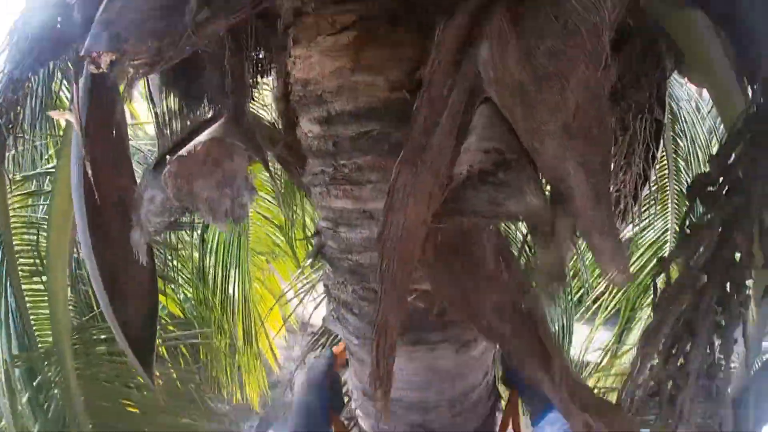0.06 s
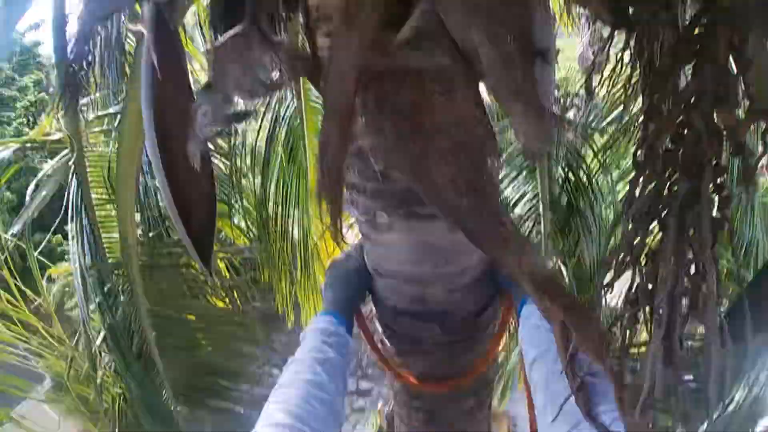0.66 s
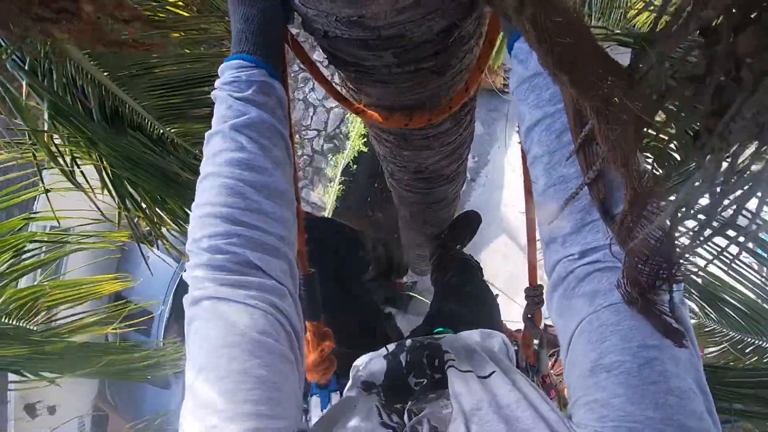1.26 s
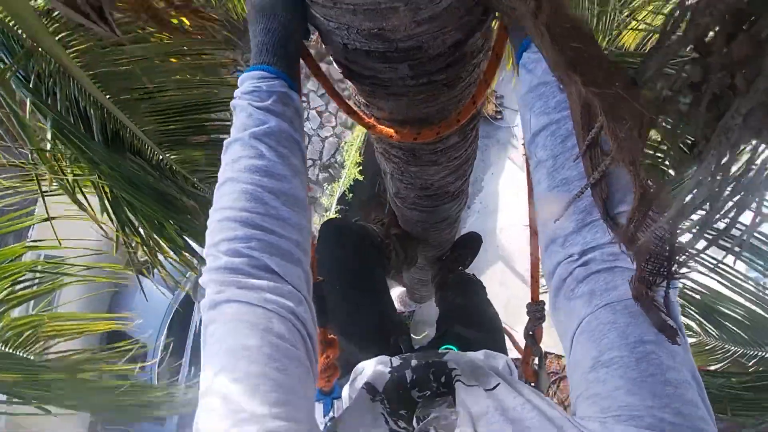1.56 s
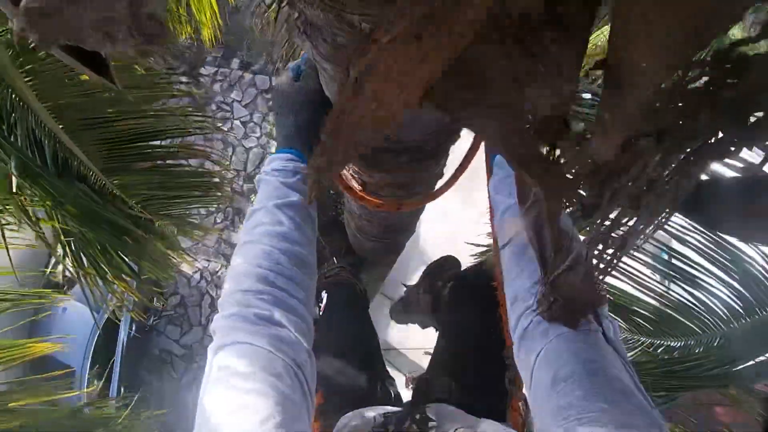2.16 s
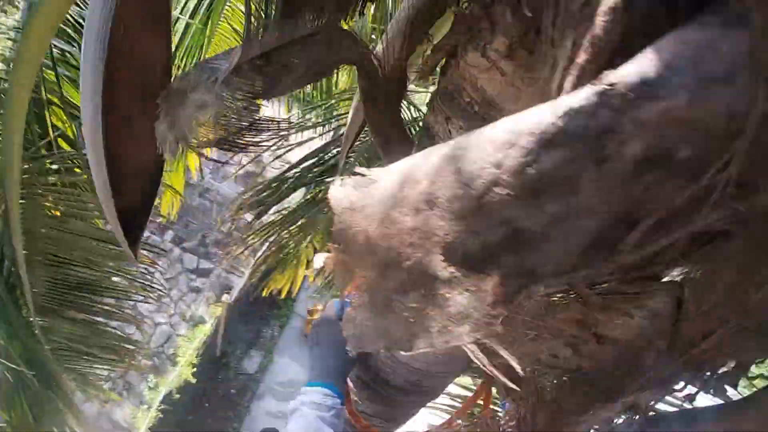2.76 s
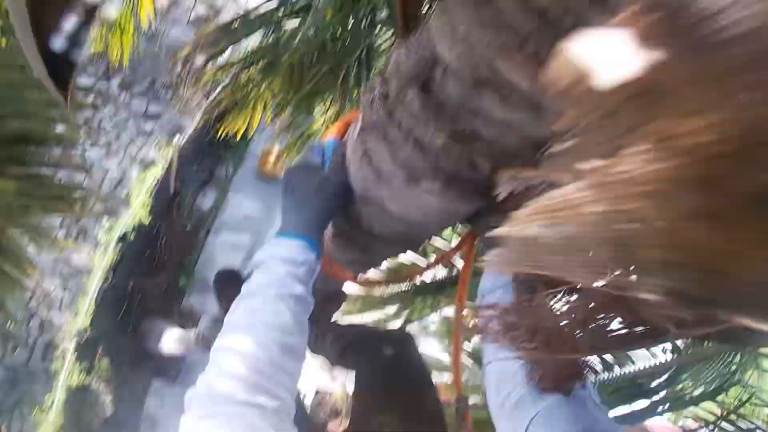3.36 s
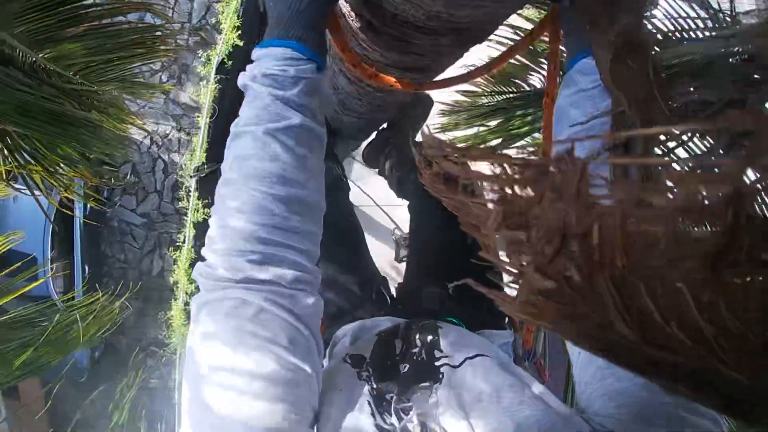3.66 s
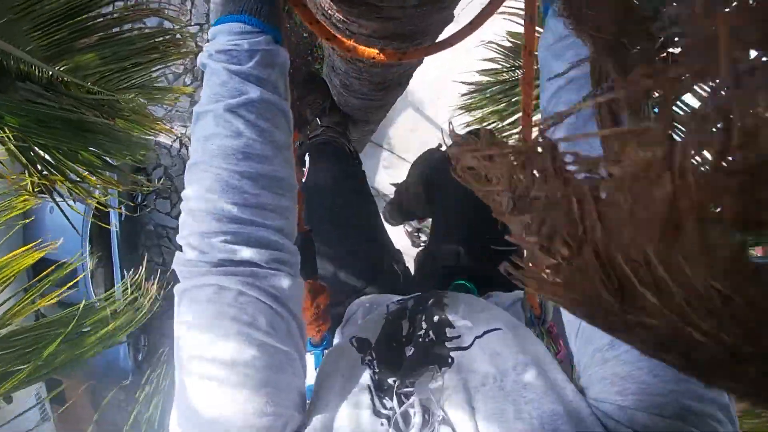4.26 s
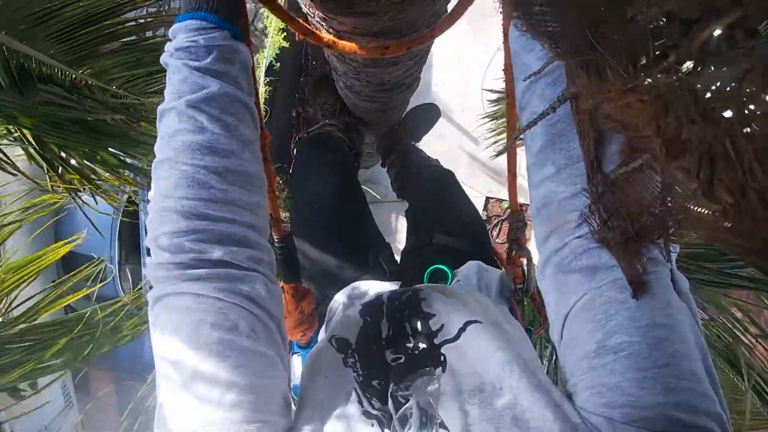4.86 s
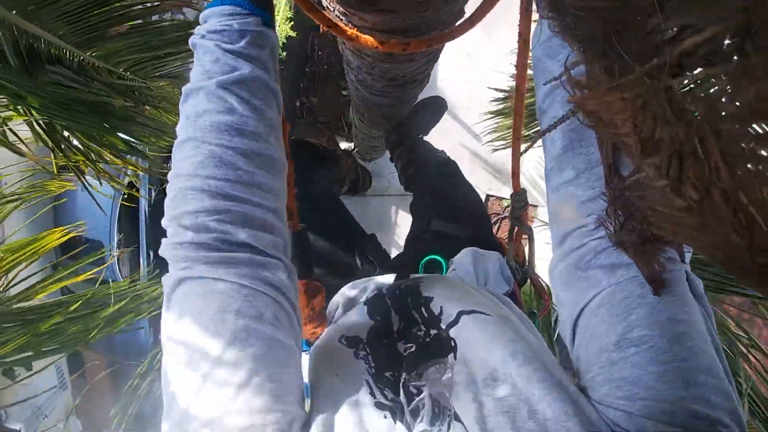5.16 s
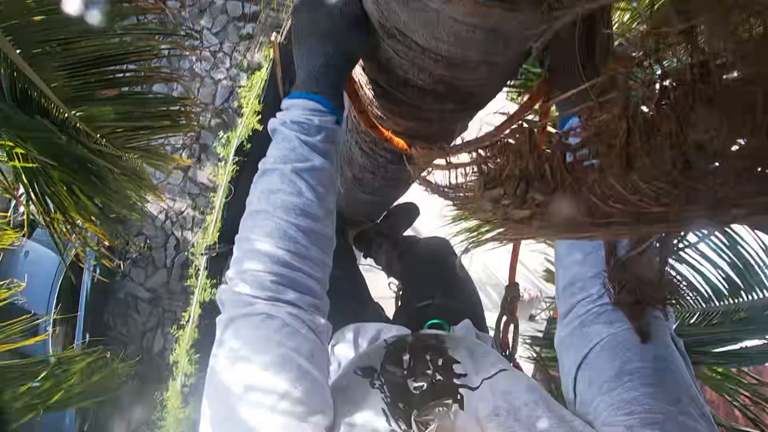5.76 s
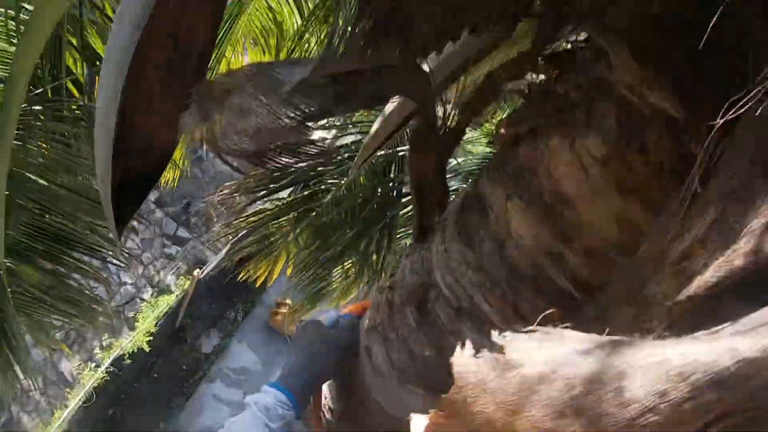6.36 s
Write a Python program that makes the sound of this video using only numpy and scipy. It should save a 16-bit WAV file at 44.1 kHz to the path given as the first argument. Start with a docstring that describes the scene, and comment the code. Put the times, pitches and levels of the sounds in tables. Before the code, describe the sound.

Rope and gear knock and scrape on a palm trunk during a climb, then a dry frond scratches across the microphone.

```python
"""Climbing a palm trunk

A climber with a camera on the head shifts a rope loop over the bark, where it rasps and creaks by
stick-slip friction. Rope and gear knock, woody frond stubs jolt the camera, and a steel pruning blade
rings in its modes now and then. A dry fibrous frond drags over the housing and swishes off.
A faint outdoor hiss lies underneath."""
import sys
import numpy as np
from scipy import signal
from scipy.fft import rfft, irfft, next_fast_len
from scipy.io import wavfile
from scipy.ndimage import uniform_filter1d, map_coordinates

SR = 44100
rng = np.random.default_rng(int(sys.argv[2]) if len(sys.argv) > 2 else 0)


def output_pcm(signal):
    """Save a mono or channel-first signal as 16-bit PCM at the path in sys.argv[1].

    Samples are clipped to [-1, 1] before scaling.
    """
    pcm = np.clip(np.atleast_2d(signal).T, -1, 1) * 32767
    wavfile.write(sys.argv[1], SR, np.round(pcm).astype(np.int16))


N = 282681

# Levels are relative within a table; each source applies its own gain.
# Faint background hiss, whose level dips at times. Each row: time in seconds, level in dB.
HISS_LEVELS = [(0, -48), (.7, -51.5), (2.2, -48), (2.85, -61.5), (3.069, -60.5), (3.35, -61.5),
               (3.65, -56.5), (4.1, -62), (5.75, -63), (5.85, -51.5), (6.15, -51), (6.4, -53.5)]
# The climber's slow sway, as air on the microphone. Each row: time in seconds, level in dB.
SWAY_LEVELS = [(0.0, -40), (0.18, -41), (1.59, -30), (2.25, -42), (2.45, -38), (2.84, -50), (4.07, -43),
               (4.46, -22.5), (4.89, -35), (5.59, -28), (5.8, -38.5), (6.41, -38.5)]
# Heaves of the body, each a whump of air. Each row: start in seconds, length in seconds, level in dB.
HEAVES = [(.05, 0.041, -21.5), (.6, 0.013, -22), (.95, 0.027, -15.5), (1.05, 0.1, -26),
          (1.39, 0.073, -15.5), (1.85, 0.12, -16.5), (2.32, 0.072, -11), (3.8, 0.2, -35),
          (4.44, 0.076, -14), (4.68, 0.012, -19.5), (5.17, 0.024, -17.5), (5.5, 0.056, -14.5),
          (5.63, 0.081, -24), (5.85, 0.025, -29.5), (6.31, .06, -35)]
# Steel fittings of the harness touching. Each row: start in seconds, level in dB.
CLINKS = [(0.935, -60), (1.315, -66), (1.390, -57), (1.468, -53), (1.555, -56.5), (1.600, -53), (1.7, -52),
          (1.846, -58), (2.680, -64.5), (4.797, -65)]
# Modes of the fittings. Each row: frequency in Hz, level in dB, 60 dB decay time in seconds.
FITTING_MODES = [(2393, -10.5, .2), (3050, -6, .1), (3830, -3.5, 0.071), (4220, -6, 0.09), (4870, -1, .08),
                 (5640, -7, 0.2), (6500, -7, .09), (8900, -12, .1)]
# Sleeves rustling as the arms reach. Each row: start in seconds, length in seconds, level in dB.
RUSTLES = [(0.0, 0.1, -55.5), (.775, 0.065, -58.5), (.915, 0.15, -58.5), (1.385, 0.12, -49.5),
           (1.49, 0.1, -53.5), (1.68, 0.076, -54), (2.29, 0.064, -48), (2.42, 0.088, -53),
           (2.55, 0.27, -63.5), (2.82, .06, -61), (3.465, 0.11, -56), (6.34, .07, -56)]
# Dry fibres breaking. Each row: time in seconds, peak level in dB, 60 dB decay time in seconds.
SNAPS = [(0.774, -45, 0.086), (1.4387, -51, 0.048), (1.6922, -26, 0.048), (2.6802, -36.5, 0.028),
         (2.7263, -40.5, 0.049), (2.764, -25.5, 0.048), (2.78, -27.5, 0.042), (2.831, -35, 0.054),
         (2.9258, -35, 0.034), (2.934, -41, 0.025), (2.9897, -35.5, 0.0074), (3.0023, -42, 0.016),
         (3.0348, -35.5, 0.024), (3.1476, -43, 0.031), (3.67, -56, 0.039), (3.7016, -47.5, 0.038),
         (3.753, -36, 0.019), (3.792, -35, 0.035), (4.797, -34.5, 0.008), (5.9602, -29.5, 0.024),
         (5.9834, -56, 0.035), (6.326, -44, 0.044), (6.3434, -44, 0.12)]
# The finest fibres ticking. Each row: time in seconds, peak level in dB.
TICKS = [(1.3865, -47), (1.436, -42), (3.439, -42), (3.4578, -34), (3.6702, -50.5), (3.8868, -60),
         (4.3342, -36), (4.375, -35.5), (4.576, -38.5), (4.7936, -46), (5.175, -51), (5.517, -61),
         (5.7057, -38), (5.963, -38), (6.3839, -52)]
# The loaded rope creaking. Each row: midpoint in seconds, length in seconds, pitch in Hz, level in dB.
CREAKS = [(0.361, 0.014, 1600, -39), (0.48, 0.0044, 840, -21.5), (0.744, 0.091, 332, -38.5),
          (0.797, 0.024, 3160, -39), (1.488, 0.016, 1190, -31), (1.69, 0.028, 1460, -26),
          (1.695, 0.0074, 3100, -21), (1.776, 0.02, 1900, -34), (1.876, 0.02, 1590, -32),
          (2.071, 0.019, 1890, -30), (2.319, 0.045, 3040, -36.5), (2.37, 0.092, 2170, -39.5),
          (2.431, 0.021, 1670, -21), (2.63, 0.066, 1960, -47), (2.833, 0.094, 583, -42.5),
          (2.977, 0.21, 308, -51.5), (3.147, 0.0066, 3050, -34)]
# Pulls of the rope over bark. Each row: start in seconds, length in seconds, rasp in dB, rub in dB.
PULLS = [(0.0, 0.041, -42, -26.5), (0.688, 0.2, -50.5, -40), (0.889, 0.25, -38, -38),
         (1.162, 0.096, -51, -45.5), (1.391, 0.35, -48, -36), (1.685, 0.095, -36.5, -37.5),
         (1.845, .19, -42, -29.5), (2.309, 0.096, -31, -32), (2.43, 0.064, -26, -14.5),
         (2.547, 0.19, -43.5, -43), (2.784, 0.088, -43.5, -43.5), (2.938, 0.064, -51.5, -52),
         (3.44, 0.054, -70, -30), (6.329, 0.087, -47, -51)]
# The frond lying on the housing. Each row: time in seconds, pressure level in dB, scratch level in dB.
FROND_LEVELS = [(3.76, -66, -81), (3.8, -33, -44), (4.0, -31.5, -42), (4.09, -46, -66), (4.24, -26, -36.5),
                (4.46, -23, -39.5), (4.58, -30.5, -43.5), (5.01, -36, -50.5), (5.2, -19, -34.5),
                (5.25, -39, -52), (5.29, -30.5, -48), (5.4, -39, -49.5), (5.52, -22.5, -43.5),
                (5.56, -29.5, -48), (5.74, -32, -42.5), (5.8, -55, -92)]
# The frond catching on the housing. Each row: time in seconds, peak level in dB.
CATCHES = [(3.793, -23.5), (3.809, -28), (4.137, -56), (4.23, -30.5), (4.315, -45), (4.334, -22),
           (4.375, -37), (4.392, -23.5), (4.43, -21.5), (4.45, -20), (4.503, -23.5), (4.533, -25.5),
           (4.679, -35), (4.972, -31), (5.176, -24), (5.2, -24), (5.21, -23), (5.296, -32.5), (5.514, -21),
           (5.706, -28.5), (5.734, -30)]
# Nudges to the pruning blade. Each row: start in seconds, level in dB.
NUDGES = [(1.045, -55), (1.724, -11.5), (1.771, -19.5), (2.004, -14.5), (2.785, -34), (2.831, -35.5)]
# Modes of the blade. Each row: frequency in Hz, level in dB, 60 dB decay time in seconds.
BLADE_MODES = [(309.6, -13.5, 0.36), (470, -24.5, 0.22), (483.5, -16.5, 0.12), (775, 2.5, 0.11),
               (856, -12, .2), (870, -9, 0.17), (1200, -24, 0.26), (2050, -15, 0.23), (2040, -9.5, 0.064),
               (2840, -32.5, 0.26)]
# Jolts to the camera. Each row: start in seconds, level in dB, final pitch in Hz.
JOLTS = [(.037, -13, 71), (.376, -8, 45), (.478, -15, 152), (.507, -10, 89.5), (.524, -6, 52),
         (.525, -12, 175), (.594, -21.5, 55), (0.81, -12, 158), (.832, -2, 58), (.835, -9, 176.4),
         (1.547, -6, 71), (1.627, -11.5, 343), (1.711, -12.5, 45), (1.726, -16, 210), (1.914, -6.5, 50.6),
         (1.986, -4, 52), (2.433, -6, 120), (2.454, -4.5, 91), (2.469, -6, 125), (2.492, -2, 206),
         (2.493, -5.5, 346), (2.568, -20, 365), (2.649, -25, 126), (3.149, -19.5, 179), (3.195, -11.5, 169),
         (3.199, -12.5, 57.3), (3.44, -16.5, 188), (3.471, -17.5, 171), (3.474, -5, 58),
         (4.328, -11.5, 160), (4.432, -10.5, 124), (4.448, -7, 34), (5.293, -15, 77), (5.516, -7.5, 52),
         (6.003, -14.5, 153)]
# Rope and gear knocking on the trunk. Each row: time in seconds, peak level in dB,
# offset of the snap in dB, resonance in Hz, 60 dB decay time of the contact force in seconds.
KNOCKS = [(.036, -29.5, -25, 1190, 0.022), (.253, -30.5, -21, 1220, 0.23), (0.369, -9, -47, 796, 0.026),
          (0.385, -14.5, -49, 1150, .045), (.412, -14, -35, 1160, .06), (.476, -21, -41, 805, 0.13),
          (.523, -11.5, -25, 1010, 0.063), (.807, -11.5, -30, 840, 0.15), (.83, -9, -16, 1160, 0.057),
          (0.934, -16, -19.5, 1860, 0.058), (.983, -14, -15.5, 1190, 0.061),
          (1.018, -20.5, -15, 2060, 0.19), (1.044, -16, -23, 1200, 0.11), (1.073, -23.5, -25, 1190, .057),
          (1.126, -20, -13.5, 920, 0.087), (1.303, -26, -25, 800, 0.087), (1.361, -30.5, -19, 800, 0.04),
          (1.492, -10.5, -31, 746, 0.026), (1.547, -21.5, -14, 1210, .028), (1.624, -12, -22.5, 700, 0.04),
          (1.691, -9, -16.5, 1190, 0.11), (1.705, -7.5, -14, 1550, 0.049), (1.724, -9, -13.5, 776, 0.097),
          (1.814, -15.5, -18, 767, 0.031), (1.876, -9.5, -19.5, 776, 0.021), (1.912, -21.5, -24, 805, .05),
          (1.982, -10, -26, 750, 0.026), (2.002, -9, -16.5, 740, .045), (2.066, -33.5, -4.5, 1970, 0.056),
          (2.119, -36, -13, 1100, 0.067), (2.256, -25.5, -18.5, 2100, 0.09),
          (2.431, -7.5, -13.5, 1550, 0.15), (2.445, -7.5, -10, 1010, 0.054), (2.467, -9.5, -23.5, 810, .11),
          (2.491, -7.5, -11.5, 1124, .033), (2.554, -30.5, -16, 766, 0.11), (3.143, -19, -37, 1110, 0.058),
          (3.192, -25, -36, 1060, 0.044), (3.409, -35.5, -21.5, 1160, 0.032), (3.44, -21.5, -13, 1160, .06),
          (3.456, -19.5, -13, 1570, .06), (3.469, -15.5, -14.5, 1180, 0.12),
          (3.513, -26.5, -14, 1150, 0.096), (3.887, -24, -25, 786, 0.02), (5.295, -27, -11, 1200, .037)]
# Peaks and hollows in the housing's response. Each row: centre in Hz, width in Hz, gain in dB.
HOUSING_RESONANCES = [(459.6, 68, 6), (677, 244, -10.5), (760, 78, 8), (1200, 87, 6.5), (1570, 120, 5.5),
                      (2140, 900, 3), (2495, 480, -6.5), (3166, 490, 7), (4070, 680, -5)]

# Source spectra, before the housing colours them. Each row: frequency in Hz, spectral density in dB.
HISS_SPECTRUM = [(100, -3), (200, 4), (400, -22), (700, -8.5), (1100, -15.5), (2000, -26), (2600, -30),
                 (3200, -25), (4100, -35), (5400, -38.5), (7500, -56.5), (15000, -74)]  # background hiss
BUFFET_SPECTRUM = [(8, -16), (25, 3), (52, 0), (80, -10.5), (160, -51), (400, -86)]  # airflow on the microphone
CRACKLE_SPECTRUM = [(800, -29.5), (2500, 6), (5000, 4), (6500, -4.5), (8000, -14.5), (9500, -9),
                    (13200, -22), (14600, -23)]  # fine fibres
SNAP_SPECTRUM = [(400, -21), (1500, -2.5), (2900, 8.5), (4000, 0), (5500, -3.5), (7500, -29.5),
                 (10000, -32), (13200, -47), (14600, -56)]  # bright, dry contacts
RASP_SPECTRUM = [(150, -27), (250, -41.5), (462, 6), (673, 4), (752, 4.5), (1350, -7.5), (2080, -2),
                 (2710, -22.5), (3160, -15.5), (7000, -43), (9100, -94.5), (15400, -120)]  # rope on ridges of bark
RUB_SPECTRUM = [(40, -10.5), (90, -4.5), (190, -1), (260, -10.5), (400, -16), (800, -33), (2000, -47.5),
                (5000, -88)]  # dull rubbing
SCRATCH_SPECTRUM = [(210, -22.5), (350, -10.5), (470, 0), (800, -2), (1800, -16), (3000, -17.5),
                    (4000, -27), (5600, -26), (7900, -53), (9400, -40), (13300, -71.5), (14600, -48)]  # coarse fibres on the housing
SWISH_SPECTRUM = [(240, -15.5), (500, -6), (900, -10.5), (1240, -4.5), (2000, -17.5), (3100, -15.5),
                  (4500, -8.5), (6200, -20), (8000, -35.5), (10000, -34), (14300, -39), (15500, -68)]  # the frond sliding off
KNOCK_SPECTRUM = [(100, -10), (300, -6), (500, 6), (900, 3), (1500, -6.5), (2100, -6), (3200, -30.5),
                  (4200, -35), (6500, -68), (15000, -102)]  # hollow clacks on the trunk


def amp(db):
    """Amplitude grows tenfold for every 20 dB."""
    return 10 ** (np.asarray(db) / 20)


def unit(x):
    """Normalisation brings a signal to an rms of 1."""
    return x / np.sqrt(np.mean(x ** 2) + 1e-20)


def add(track, start, sound):
    """Superposition: a sound adds to the track from its start in seconds."""
    first = max(round(start * SR), 0)
    track[first:first + len(sound)] += sound[:max(N - first, 0)]


def gains(rows):
    """Interpolation in decibels gives a gain curve for each level column, silent outside the rows."""
    times, *columns = np.transpose(rows)
    return [amp(np.interp(np.arange(N) / SR, times, db, left=-120, right=-120)) for db in columns]


def strokes(rows, rise_s, fall_s):
    """Incoherent movements add in power; each swells by 60 dB in rise_s, holds, and fades in fall_s."""
    t, power = np.arange(0, N, 32) / SR, 0
    for start, length, db in rows:
        away = np.maximum(start - t, 0) / rise_s + np.maximum(t - start - length, 0) / fall_s
        power = power + amp(db - 60 * away) ** 2
    return np.interp(np.arange(N) / SR, t, np.sqrt(power))


def wobble(rate):
    """A spline through random values, rate of them a second, fluctuates smoothly."""
    knots = rng.standard_normal(int(N * rate / SR) + 4)
    return map_coordinates(knots, [np.arange(N) * rate / SR])


def coloured(x, spectrum, resonances=()):
    """Source and filter: a spectrum, the housing and any further resonances shape x at minimum phase."""
    size = 2 * next_fast_len(len(x) // 2 + 2048)
    hz = np.fft.rfftfreq(size, 1 / SR)
    knot_hz, knot_db = np.transpose(spectrum)
    db = np.interp(np.log(hz + 1), np.log(knot_hz), knot_db)
    for centre, width, peak_db in [*HOUSING_RESONANCES, *resonances]:
        db += peak_db / (1 + (2 * (hz - centre) / width) ** 2)
    cepstrum = irfft(np.log(amp(db) + 1e-6))
    cepstrum[1:size // 2] *= 2  # folding the cepstrum makes the filter causal
    cepstrum[size // 2 + 1:] = 0
    return irfft(rfft(x, size) * np.exp(rfft(cepstrum)), size)[:len(x)]


def spot(depth_db=4, q=14, count=24):
    """Response depends on the point of impact: every spot has its own peaks and hollows."""
    centres = np.geomspace(500, 12000, count) * np.exp(rng.normal(0, .05, count))
    return list(zip(centres, centres / q, depth_db * rng.uniform(-1.7, 1.5, count)))


def wandering(x, depth_db=4.5, width_hz=150, hold_s=.03):
    """A moving contact point is a time-varying filter: narrow resonances come and go."""
    hz, t, spectra = signal.stft(x, SR, nperseg=512)
    cells = np.meshgrid(hz / width_hz, t / hold_s, indexing="ij")
    field = map_coordinates(rng.standard_normal((300, 500)), cells, order=1, mode="wrap")
    return signal.istft(spectra * amp(depth_db * field), nperseg=512)[1][:len(x)]


def friction(spectrum, slip_hz, spread_db, clump_hz, clump_db):
    """Stick-slip friction: random, uneven kicks come in clumps and excite resonances, at an rms of 1."""
    slipping = rng.random(N) < slip_hz / SR
    direction = np.sign(rng.standard_normal(N))
    strength = amp(spread_db * rng.uniform(-0.7, 1, N))
    clumps = amp(clump_db * np.tanh(wobble(clump_hz)))
    force = unit(slipping * direction * strength) * clumps
    return unit(coloured(wandering(force), spectrum))


def contact(track, time, db, spectrum, resonances, swell_s, t60, strike):
    """An impact is an impulse amid noise: scuffing swells, the parts strike, and the chatter dies."""
    t = np.arange(-SR // 25, SR // 6) / SR
    envelope = np.where(t < 0, np.exp(-np.abs(t) / swell_s), amp(-60 * np.abs(t) / t60))
    chatter = envelope * rng.standard_normal(len(t))
    force = chatter / np.linalg.norm(chatter) + strike * (t == 0)
    sound = coloured(force, spectrum, resonances)
    peak = 2 * np.sqrt(uniform_filter1d(sound ** 2, size=220).max())
    add(track, time + t[0], amp(db) * sound / peak)


def ringing(hits, modes, scatter_db=3, attack_s=0.0018):
    """Free vibration is a sum of damped modes; each touch excites them at new strengths and phases."""
    out, t = np.zeros(N), np.arange(SR * 3 // 4) / SR
    for start, hit_db in hits:
        for hz, mode_db, t60 in modes:
            ring = np.sin(2 * np.pi * (hz * t + rng.random())) * (1 - np.exp(-t / attack_s))
            db = hit_db + mode_db + scatter_db * rng.standard_normal()
            add(out, start, amp(db - 60 * t / t60) * ring)
    return out


def air(sway_db=-1, heave_db=-3, hiss_db=1, shove_db=-15, shove_s=0.034):
    """Turbulent pressure from sway, heaves and jolts buffets the microphone over a background hiss."""
    shoves = [(start, shove_s, db + shove_db) for start, db, _ in JOLTS]
    heaves = amp(heave_db) * strokes([*HEAVES, *shoves], rise_s=0.11, fall_s=0.18)
    sway = amp(sway_db) * gains(SWAY_LEVELS)[0]
    buffet = np.hypot(sway, heaves) * unit(coloured(rng.standard_normal(N), BUFFET_SPECTRUM))
    times, levels = np.transpose(HISS_LEVELS)
    hiss_gain = amp(hiss_db + np.interp(np.arange(N) / SR, times, levels))
    return buffet + hiss_gain * unit(coloured(rng.standard_normal(N), HISS_SPECTRUM))


def harness(level_db=-1, chatter_db=4):
    """Steel fittings ring faintly in their modes, modulated in amplitude as they rattle together."""
    return ringing(CLINKS, FITTING_MODES) * amp(level_db + chatter_db * np.tanh(2 * wobble(260)))


def sleeves(crackle_db=-10):
    """Sliding friction makes cloth rustle along the trunk and crackle on its dry fibres."""
    reach = strokes(RUSTLES, rise_s=0.056, fall_s=0.093)
    rustle = friction(SNAP_SPECTRUM, slip_hz=3900, spread_db=12, clump_hz=75, clump_db=11)
    crackle = friction(CRACKLE_SPECTRUM, slip_hz=1800, spread_db=11.5, clump_hz=30, clump_db=13)
    return reach * (rustle + amp(crackle_db) * crackle)


def fibres(tick_db=1):
    """Brittle fracture releases strain at once: dry fibres snap, and the finest only tick."""
    out = np.zeros(N)
    for time, db, t60 in SNAPS:
        contact(out, time + 0.0045, db, SNAP_SPECTRUM, spot(depth_db=10),
                swell_s=0.0019, t60=t60, strike=0.82)
    for time, db in TICKS:
        contact(out, time + 0.001013, db + tick_db, CRACKLE_SPECTRUM, spot(),
                swell_s=0.0034, t60=0.048, strike=0.48)
    return out


def creaks(relative_width=.13):
    """Rapid, nearly periodic stick-slip of the rope gives a narrow noise band, heard as a rough pitch."""
    out, t = np.zeros(N), np.arange(-SR // 8, SR // 8) / SR
    hz = np.fft.rfftfreq(len(t), 1 / SR)
    for midpoint, length, pitch, db in CREAKS:
        band = np.exp(-((hz / pitch - 1) / relative_width) ** 2)
        swell = np.exp(-(2 * t / length) ** 2)
        creak = irfft(rfft(rng.standard_normal(len(t))) * band, len(t)) * swell
        add(out, midpoint + t[0], amp(db) * creak * np.linalg.norm(swell) / np.linalg.norm(creak))
    return out


def rope(rub_db=-2, rise_s=.055, fall_s=.09, drag_db=-21.5, drag_s=.02):
    """Friction on ridged bark makes each pull rasp and rub; knocked gear rubs on for a moment."""
    rasp_gain = strokes([(start, length, db) for start, length, db, _ in PULLS], rise_s, fall_s)
    rub_gain = strokes([(start, length, db) for start, length, _, db in PULLS], rise_s, fall_s)
    drag_gain = strokes([(time, drag_s, db + drag_db) for time, db, *_ in KNOCKS], rise_s, fall_s=.22)
    rasp = friction(RASP_SPECTRUM, slip_hz=2500, spread_db=14, clump_hz=130, clump_db=6.5)
    rub = friction(RUB_SPECTRUM, slip_hz=600, spread_db=6.5, clump_hz=56, clump_db=9)
    return rasp_gain * rasp + amp(rub_db) * np.hypot(rub_gain, drag_gain) * rub


def frond(rub_db=-2, scratch_db=-2, crackle_db=-14, load_db=-10, load_scratch_db=-12, crack_db=-14):
    """Friction grows with load: coarse fibres drag over the housing, tighten, and catch with a crack."""
    pressure, scrape = gains(FROND_LEVELS)
    load = strokes([(time, 0, db + load_db) for time, db in CATCHES], rise_s=0.19, fall_s=0.048)
    pressure = np.hypot(pressure, load)
    scrape = np.hypot(scrape, amp(load_scratch_db) * load)
    rub = friction(RUB_SPECTRUM, slip_hz=600, spread_db=8.5, clump_hz=49, clump_db=-0.1)
    scratch = friction(SCRATCH_SPECTRUM, slip_hz=3000, spread_db=11.5, clump_hz=150, clump_db=5.5)
    crackle = friction(CRACKLE_SPECTRUM, slip_hz=1900, spread_db=10, clump_hz=57, clump_db=5)
    out = amp(rub_db) * pressure * rub
    out += scrape * (amp(scratch_db) * scratch + amp(crackle_db) * crackle)
    for time, db in CATCHES:
        contact(out, time + 0.001396, db, SCRATCH_SPECTRUM, spot(),
                swell_s=0.003, t60=0.024, strike=0.38)
        contact(out, time + 0.001348, db + crack_db, SNAP_SPECTRUM, spot(),
                swell_s=0.0017, t60=0.037, strike=0.38)
    return out


def swish(start_s=5.95, free_s=6.103, slide_db=-28, growth_db_per_s=110, tip_db=-24, crackle_db=-15):
    """Friction noise grows with speed: the frond slides off ever faster until its tip flicks free."""
    remaining_s = np.maximum(free_s - np.arange(N) / SR, 0)
    slide = strokes([(start_s, free_s - start_s, slide_db)], rise_s=0.056, fall_s=0.028)
    flick = strokes([(free_s, 0, tip_db)], rise_s=0.13, fall_s=0.028)
    sweep = np.hypot(slide * amp(-growth_db_per_s * remaining_s), flick)
    hiss = friction(SWISH_SPECTRUM, slip_hz=5400, spread_db=3, clump_hz=220, clump_db=7)
    rip = friction(CRACKLE_SPECTRUM, slip_hz=1700, spread_db=17, clump_hz=150, clump_db=5)
    return sweep * (hiss + amp(crackle_db) * rip)


def blade(level_db=-4, chatter_db=3):
    """The pruning blade rings in its modes, modulated by chatter against the frond that holds it."""
    return ringing(NUDGES, BLADE_MODES) * amp(level_db + chatter_db * wobble(160))


def jolts(level_db=2, attack_s=0.0011, sag=0.17, crunch=0.33, reference_t60=0.053, reference_hz=96):
    """The jolted camera on its strap is a damped oscillator whose pitch sags as the strap gives."""
    out, t = np.zeros(N), np.arange(SR // 4) / SR
    for start, db, hz in JOLTS:
        t60 = reference_t60 * (reference_hz / hz) ** .33  # higher jolts die sooner
        pitch = hz * (1 + sag * np.exp(-t * hz))
        swing = np.sin(2 * np.pi * np.cumsum(pitch) / SR)
        rub = unit(coloured(rng.standard_normal(len(t)), RUB_SPECTRUM))
        envelope = amp(db + level_db - 60 * t / t60) * (1 - np.exp(-t / attack_s))
        add(out, start, envelope * (swing + crunch * rub))
    return out


def knocks(body_db=-1, snap_db=2, lag_s=0.00212, swell_s=0.0045, ring_db=7, ring_width_hz=150):
    """Impact excites resonance: gear on the trunk gives a pitched clack and a shorter, brighter snap."""
    out = np.zeros(N)
    for time, db, snap_offset_db, hz, t60 in KNOCKS:
        resonances = spot(depth_db=1.5) + [(hz, ring_width_hz, ring_db)]
        contact(out, time + lag_s, db + body_db, KNOCK_SPECTRUM, resonances, swell_s, t60, strike=0.95)
        contact(out, time + lag_s, db + snap_offset_db + snap_db, SNAP_SPECTRUM, spot(),
                swell_s, t60 * 0.77, strike=1.0)
    return out


def scene():
    """In a free field, sources within arm's reach superpose without echo."""
    gear = knocks() + jolts() + blade() + harness()
    climbing = fibres() + creaks() + rope() + sleeves()
    return (gear + climbing + frond() + swish() + air())[None]


def record(dry):
    """Band limiting and saturation: the camera drops deep bass, rounds peaks and cuts the top treble."""
    bass_cut = signal.butter(1, 10, "high", fs=SR, output="sos")
    treble_rolloff = signal.butter(8, 14200, fs=SR, output="sos")
    band_limit = signal.ellip(10, .1, 90, 15500, fs=SR, output="sos")
    x = signal.sosfilt(bass_cut, dry)
    rounded = x / (1 + np.abs(x) ** 6) ** (1 / 6)
    return signal.sosfilt(band_limit, signal.sosfilt(treble_rolloff, rounded))


dry = scene()
out = record(dry)
output_pcm(out)
```